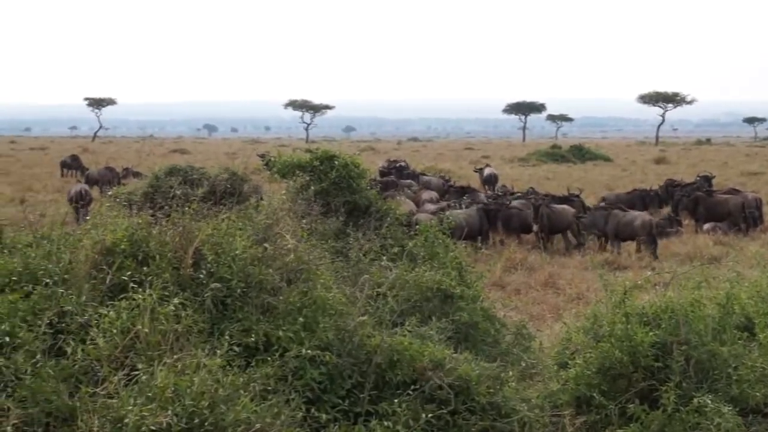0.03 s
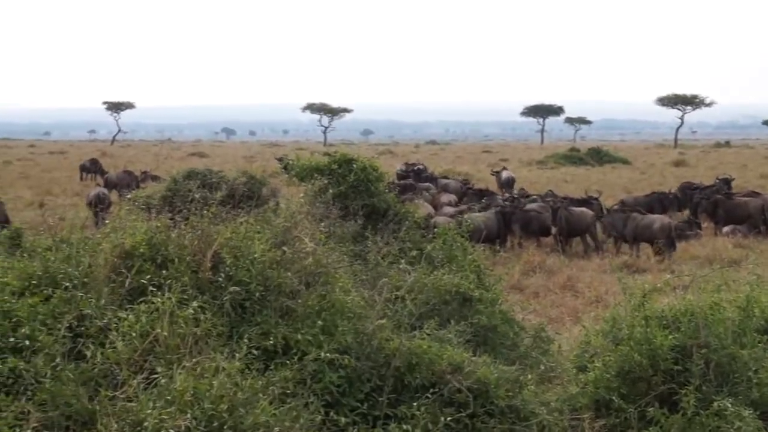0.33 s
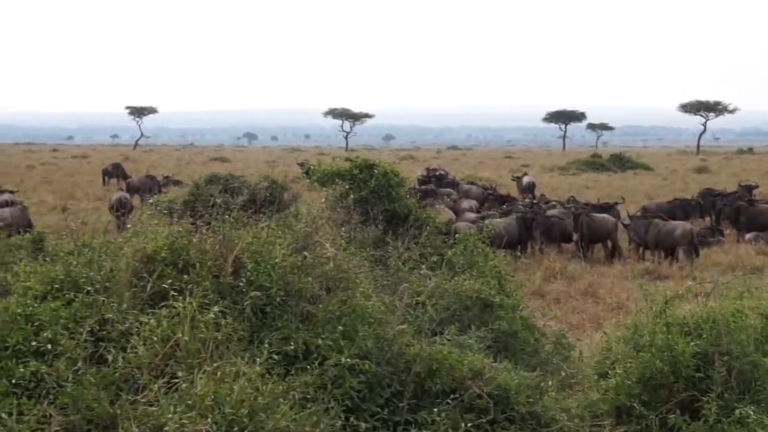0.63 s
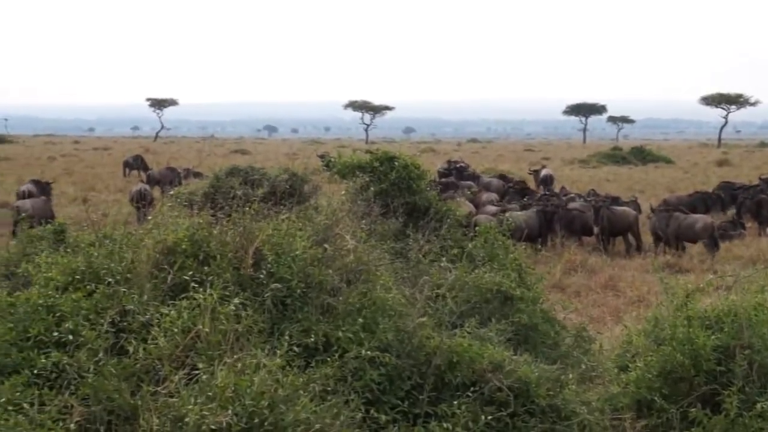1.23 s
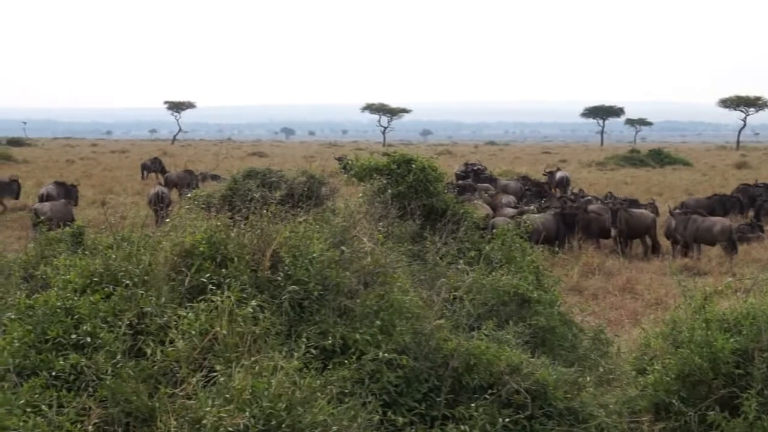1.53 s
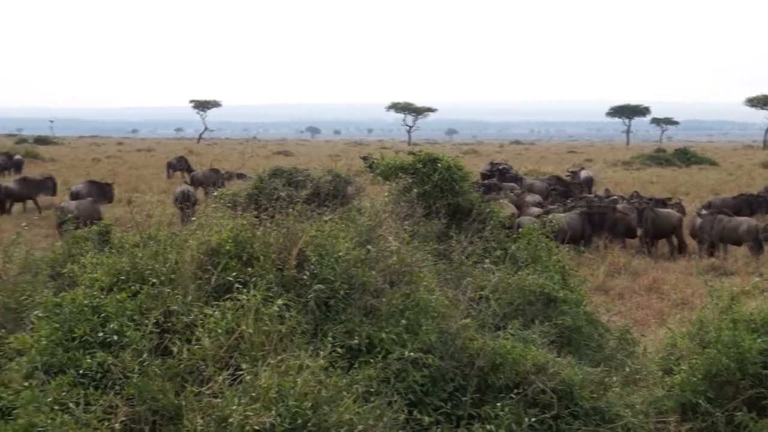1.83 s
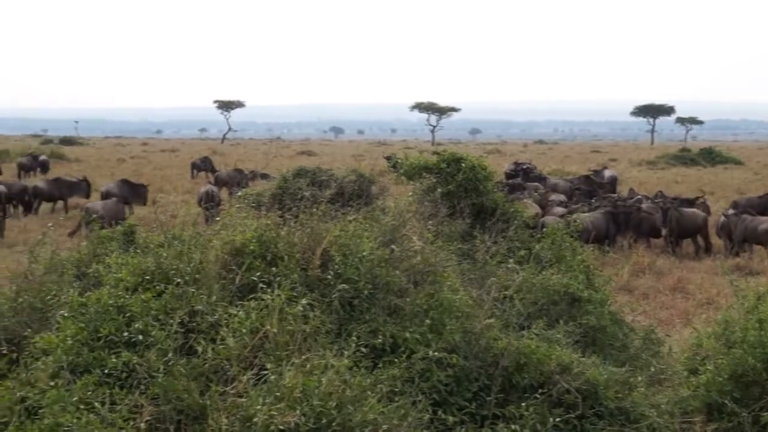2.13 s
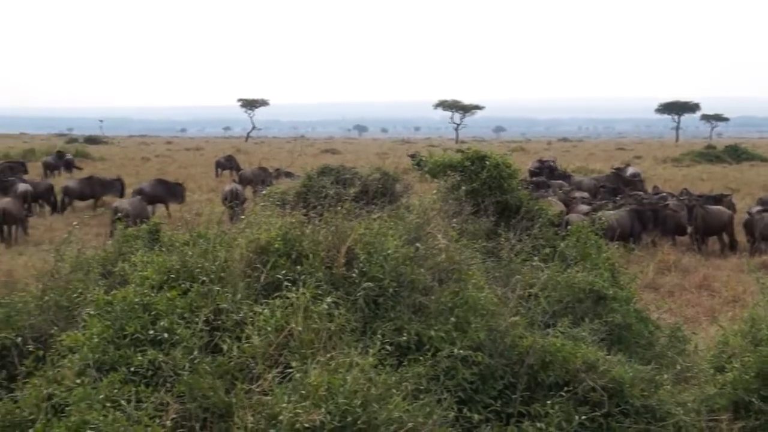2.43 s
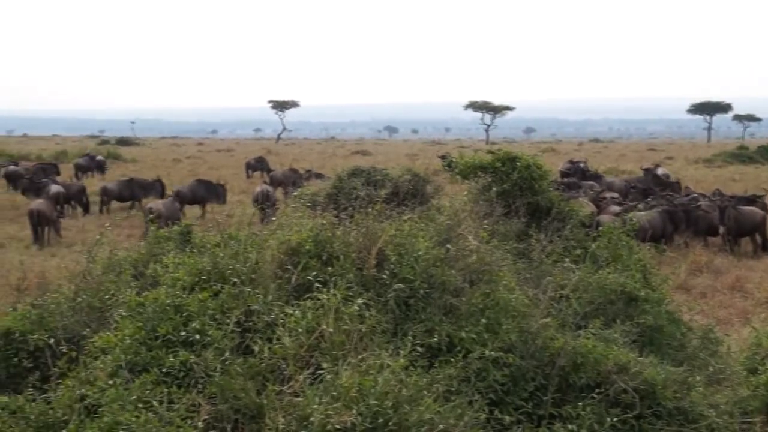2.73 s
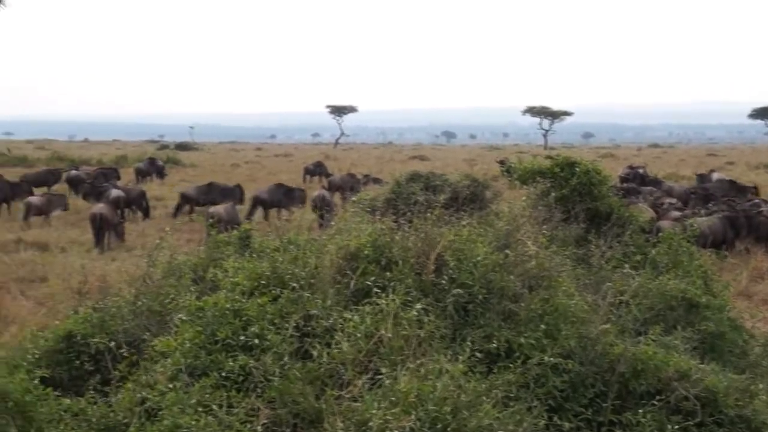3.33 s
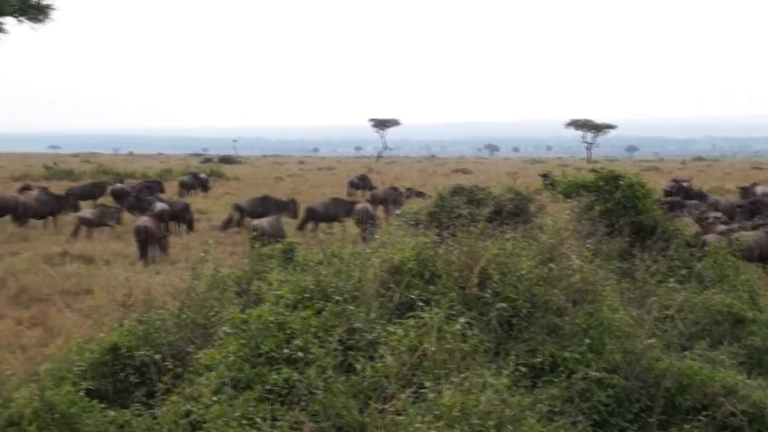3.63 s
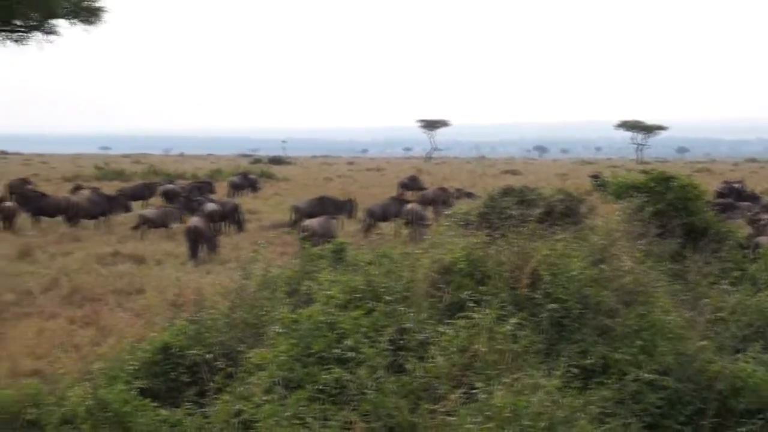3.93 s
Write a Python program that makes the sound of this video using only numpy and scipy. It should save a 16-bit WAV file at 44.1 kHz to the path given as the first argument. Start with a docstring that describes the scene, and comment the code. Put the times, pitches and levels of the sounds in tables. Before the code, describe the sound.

Low, nasal wildebeest grunts follow each other on open savanna over a rumble of wind.

```python
"""Wildebeest grunt one after another on open savanna, in long, nasal voices.
Slow pulses of their vocal folds make the throat ring, and each grunt cracks near its end.
A gust buffets the microphone for the first second, then drops to a low rumble with single puffs.
Faint birds and a thin hiss lie behind."""
import sys
import numpy as np
from scipy import signal
from scipy.fft import rfft, irfft, next_fast_len
from scipy.io import wavfile
from scipy.ndimage import uniform_filter1d, map_coordinates

SR = 44100
rng = np.random.default_rng(int(sys.argv[2]) if len(sys.argv) > 2 else 0)


def file_out(sig):
    """Save sig as 16-bit WAV at sys.argv[1]."""
    # one column per channel
    cols = np.atleast_2d(sig).T
    # limit, then scale
    lim = np.clip(cols, -1, 1)
    pcm = np.round(lim * 32767).astype(np.int16)
    wavfile.write(sys.argv[1], SR, pcm)


N = 176400
ONE_PORT = 0.74  # share of the wind that strikes just one of the microphone's two openings

# where each throat shape rings: f/Hz, width/Hz, level/dB
THROAT_A = [(795, 140, -1.5), (1223, 170, 8), (1800, 99, 5), (2322, 81, 0), (2913, 80, -7),
            (3390, 450, -15), (3750, 180, -13.5)]
THROAT_B = [(523, 61, -10), (713, 90, 0.5), (851, 87, -5.5), (1273, 98, 0), (1653, 210, -14.5),
            (2090, 160, -20.5), (2500, 230, -22.5), (2820, 120, -22.5), (3420, 180, -21.5),
            (3765, 180, -23), (4090, 220, -26)]
THROAT_C = [(189, 58, -3), (568.5, 56, 0), (728, 87, -4), (823, 87, -0.5), (1110, 87, -8.5),
            (1294, 93, -6.5), (1715, 100, -19), (2200, 120, -20), (2340, 100, -22), (2920, 100, -20),
            (3850, 250, -21), (4120, 300, -17), (4520, 160, -23)]
THROAT_C_LATE = [(163, 42, -6.5), (563, 39, 5.5), (694, 66, -0.5), (788, 61, -2), (1140, 85, -6.5),
                 (1330, 97, -10.5), (1770, 90, -10), (2330, 140, -17.5), (2910, 120, -17), (3530, 210, -13),
                 (4070, 660, -14)]
THROAT_D = [(525, 60, -16.5), (682, 89, -9.5), (861, 110, -6.5), (1138, 53, -4), (1278, 79, 4),
            (1657, 156, -8), (1880, 98, -20), (2170, 170, -23.5), (2540, 100, -21.5), (2780, 130, -27),
            (4060, 150, -29)]
THROAT_E = [(540, 91, -3.5), (818, 114, 2), (1196, 130, -4.5), (1349, 93, -2.5), (1700, 180, -11.5),
            (2370, 200, -16), (3000, 250, -15), (3520, 280, -16), (4230, 400, -26)]
THROAT_F = [(804, 190, 7), (1086, 194, 3.5), (1660, 160, -8), (2400, 410, -8), (3324, 260, -2.5),
            (4300, 400, -19), (5330, 300, -15.5), (6670, 680, -14)]


def amp(db):
    """Turn decibels into a gain."""
    return 10 ** (np.asarray(db) / 20)


def unit(x):
    """Scale to an average power of 1."""
    return x / np.sqrt(np.mean(x ** 2) + 1e-20)


def local_level(x, samples, floor=1e-12):
    """Running strength of x; dividing by it evens out chance swells."""
    return np.sqrt(np.abs(uniform_filter1d(x ** 2, samples)) + floor)


def along(points, hz):
    """Read between (f/Hz, value) points on a logarithmic frequency axis."""
    f, values = np.transpose(points)
    return np.interp(np.log(hz + 1), np.log(f + 1), values)


def clock():
    """Time of each sample in seconds."""
    return np.arange(N) / SR


def curves(rows):
    """Draw each column after the time as one value per sample."""
    times, *columns = np.transpose(rows)
    return [np.interp(clock(), times, column) for column in columns]


def filtered(x, response):
    """Multiply each frequency f in x by response(f)."""
    size = next_fast_len(N + SR // 2)
    return irfft(rfft(x, size) * response(np.fft.rfftfreq(size, 1 / SR)), size)[..., :N]


def split(x, hz, order=8):
    """The parts of x below and above hz."""
    low = filtered(x, lambda f: 1 / (1 + (f / hz) ** order))
    return low, x - low


def air(colour, width, one_port):
    """Stereo noise: mid is what left and right share, side is how they differ."""
    noise = filtered(rng.standard_normal((2, N)), lambda f: amp(along(colour, f)))
    mid, other = map(unit, noise)
    # wind on one opening alone reaches left and right out of step (1j is a quarter cycle)
    side = filtered(mid, lambda f: 1j * one_port ** .5 * amp(along(width, f)))
    side += filtered(other, lambda f: (1 - one_port) ** .5 * amp(along(width, f)))
    return np.array([mid - side, mid + side])


def hiss():
    """A thin hiss that dips during the gust and slowly returns."""
    loudness = [(.03, -65.5), (.33, -68), (.7, -75.5), (.88, -74), (.96, -80), (1.15, -78.5), (1.28, -75),
                (1.82, -78.5), (2.05, -69.5), (2.16, -72), (2.45, -66), (3.4, -66.5), (3.9, -63)]  # dip and return: t/s, relative level/dB
    colour = [(200, 10.5), (700, 8), (1500, 3.5), (3000, 3), (5000, -1), (8000, -0.5), (12500, 0),
              (15500, -3.5)]  # tone: f/Hz, level/dB
    width = [(300, -2.5), (3000, 2), (5000, 4), (8000, -20.5), (13000, -7.5)]  # stereo width: f/Hz, side over mid/dB
    level_db, = curves(loudness)
    return air(colour, width, 0) * amp(level_db + 7)


def birds():
    """Thin far whistles and chirps, blurred by distance into narrow bands of noise."""
    calls = [(0.663, .11, 3670, 50, -78.5), (.835, 0.045, 3990, 400, -68.5), (0.942, 0.14, 2330, 50.4, -70),
             (0.973, 0.079, 1596, 40.5, -60.5), (1.21, .035, 6600, 300, -73)]  # bird notes: t/s, length/s, f/Hz, width/Hz, level/dB
    out = np.zeros(N)
    for start, length, hz, width, db in calls:
        note = unit(filtered(rng.standard_normal(N), lambda f: np.exp(-.5 * ((f - hz) / width) ** 2)))
        progress = np.clip((clock() - start) / length, 0, 1)
        out += amp(db) * note * np.sqrt(np.abs(np.sin(np.pi * progress)))
    return out


def breeze():
    """A low, uneven rumble of wind between the buffets."""
    loudness = [(1.2, -41.5), (1.5, -30.5), (1.57, -38.5), (1.68, -33), (1.8, -42), (2.02, -35),
                (2.3, -40.5), (2.38, -46), (2.6, -46.5), (2.85, -40), (3.05, -40.5), (3.3, -31),
                (3.5, -44.5), (3.62, -33), (3.8, -29), (4, -34)]  # swells: t/s, level/dB
    colour = [(12, -30), (20, -1.5), (43, 7), (139, -1), (293, -18), (450, -37), (1500, -100)]  # tone: f/Hz, level/dB
    width = [(60, -10.5), (240, -3), (950, 9)]  # stereo width: f/Hz, side over mid/dB
    level_db, = curves(loudness)
    rumble = air(colour, width, ONE_PORT)
    return rumble / local_level(rumble.mean(0), samples=3000, floor=.05) * amp(level_db)


def gust():
    """Swirling air hits the microphone: the harder the swirl, the higher its sound reaches."""
    long_gust = [(0, -21, 305), (.25, -20.5, 326), (.48, -20.5, 318), (.57, -24, 390), (.6, -23.5, 278),
                 (.68, -29.5, 230), (.76, -25, 268), (.87, -21.5, 298), (.92, -21.5, 493), (1, -19.5, 495),
                 (1.13, -26.5, 429), (1.22, -26.5, 450), (1.26, -33.5, 230), (1.38, -57.5, 149.3)]  # opening gust: t/s, relative level/dB, reach/Hz
    puffs = [(0.297, 0.019, -19, 420), (0.416, 0.007, -17, 376), (0.538, 0.018, -14.5, 400),
             (0.568, 0.0045, -18, 580), (0.622, 0.0057, -17.5, 660), (0.731, 0.003, -22.5, 460),
             (0.745, 0.0032, -18.5, 350), (0.788, 0.0088, -17.5, 440), (.908, 0.0021, -17, 656),
             (0.93, 0.027, -20.5, 550), (1.05, 0.006, -15, 725), (1.092, 0.017, -16.5, 603),
             (1.118, 0.0035, -19, 610), (1.155, 0.0098, -16, 506), (1.186, 0.0093, -16, 610),
             (1.219, 0.011, -16.5, 598), (1.283, 0.0051, -21, 310), (1.313, 0.027, -25.5, 216),
             (1.633, 0.011, -29, 138), (1.693, 0.015, -29.5, 171), (2.01, 0.023, -27, 163),
             (2.116, 0.0058, -38.5, 197), (2.188, 0.0039, -22.5, 287), (2.193, 0.0091, -25.5, 169),
             (2.223, 0.0058, -25, 209), (2.264, 0.007, -33, 201), (2.719, 0.0066, -30.5, 141),
             (3.158, 0.018, -19.5, 150), (3.35, 0.025, -19.5, 168), (3.384, 0.004, -17.5, 230),
             (3.708, 0.013, -27, 166), (3.805, 0.0094, -19, 155), (3.909, 0.008, -23.5, 165)]  # single buffets: t/s, half length/s, relative level/dB, reach/Hz
    colour = [(15, -30.5), (25, -10.5), (70, 2), (150, 2.5), (260, 2.5), (420, -0.5), (750, -1), (1300, -6),
              (2000, -5.5)]  # tone before the highs are dulled: f/Hz, level/dB
    width = [(30, -15.5), (60, -11.5), (180, -1.5), (500, 5.5), (1600, 6)]  # stereo width: f/Hz, side over mid/dB
    swirls_per_s, swirl_db, swirl_reach = 170, 1.26, 0.12
    t = clock()
    level_db, gust_hz = curves(long_gust)
    swirls = map_coordinates(rng.standard_normal(2000), [t * swirls_per_s])
    power = amp(2 * (level_db + swirl_db * swirls))
    weighted_hz = power * gust_hz  # the loudest part sets the brightness
    for at, half_length, db, puff_hz in puffs:
        puff = amp(2 * db) / (1 + ((t - at) / half_length) ** 6)
        power += puff
        weighted_hz += puff * puff_hz
    reach_hz = weighted_hz / power * np.exp(swirl_reach * swirls)
    rest = air(colour + [(4000, -20), (8000, -80)], width, ONE_PORT)
    wind = 0
    for hz in np.geomspace(100, 2800, 9):  # bands above the reach fade away
        band, rest = split(rest, hz * 1.23, order=10)
        wind += band * np.exp(-(hz / reach_hz) ** 1.495)
    fade_in = np.minimum(t / .003, 1)
    return wind / local_level(wind.mean(0), samples=900) * np.sqrt(power) * amp(-2) * fade_in


def bush_echo(sound):
    """Bushes scatter a short, weak echo."""
    decay = [(300, 0.11), (1500, 0.29), (6000, 0.034)]  # echo length: f/Hz, time/s (to fall by 60 dB)
    hz, t, noise = signal.stft(rng.standard_normal((2, SR // 2)), SR, nperseg=256)
    tail = signal.istft(noise * amp(-60 * t / along(decay, hz)[:, None]), SR, nperseg=256)[1]
    return amp(-13) * signal.fftconvolve(sound, tail / np.linalg.norm(tail[0]), axes=1)[:, :N]


def grass_blur(x, longest_s=.006, band_hz=300):
    """Grass and bushes blur each pulse: every narrow band arrives late by its own amount."""
    delays = rng.uniform(0, longest_s, size=80)
    delay = lambda f: np.interp(f / band_hz, np.arange(len(delays)), delays)
    return filtered(x, lambda f: np.exp(-2j * np.pi * np.cumsum(delay(f)) * f[1]))


def vocal_folds(pitch_hz, rough, jitter_s=0.00062, scatter_db=1):
    """Each flap gives a pulse and a puff of air; roughness upsets the pulses' timing and size."""
    cycles = np.cumsum(pitch_hz) / SR
    flaps = np.flatnonzero(np.diff(np.floor(cycles)))
    timing, size = rng.standard_normal((500, 2))[:len(flaps)].T
    when = np.clip(flaps + timing * jitter_s * SR * rough[flaps], 0, N - 1).astype(int)
    pulses = unit(np.bincount(when, amp(scatter_db * size * rough[flaps] ** .5), N))
    puffs = unit(rng.standard_normal(N) * np.exp(-(cycles % 1)))
    return np.array([pulses, puffs])


def throat_response(throat, f):
    """A throat rings at a few sharp peaks and lets little through elsewhere."""
    peaks = sum(amp(db) * (1j * f * width / (hz * hz - f * f + 1j * f * width)) ** 2
                for hz, width, db in throat)
    low_hz, high_hz = .75 * min(throat)[0], 1.15 * max(throat)[0]
    return peaks / (1 + (f / high_hz) ** 10) / (1 + (low_hz / (f + 1)) ** 10)


def grunt(throat, end_throat, start, full, crack, end, top_hz, top_s, arch_s,
          rough, body_db, crack_db, treble_db, growth_db_per_s, pan_db):
    """The folds ring the throat: the voice swells, holds, cracks and is cut off."""
    pitch_sag, crack_s = .055, 0.036
    swell_db, release_db_per_s = 22.5, 329.5
    rasp_db, rasp_release_db_per_s = 3.5, 200  # the crack adds treble, which dies faster than the body
    t = clock()
    pitch_hz = top_hz * (1 - pitch_sag * np.minimum(np.abs((t - top_s) / arch_s) ** 3, 1))
    early = np.clip((full - t) / (full - start), 0, None)
    cracked = np.clip((t - crack) / crack_s, 0, 1)
    before_s, after_s = np.maximum(start - t, 0), np.maximum(t - end, 0)
    effort_db = -swell_db * early - release_db_per_s * (before_s + after_s)
    treble_db = treble_db + growth_db_per_s * (np.clip(t, start, end) - top_s)
    treble_db += rasp_db * cracked - rasp_release_db_per_s * after_s
    edges = np.maximum(np.minimum(4 * early, 1), cracked)
    rough = np.clip(rough + 0.2 * edges, 0, .9)  # the folds flap roughly at both ends
    pulses, puffs = grass_blur(vocal_folds(pitch_hz, rough))
    breath = np.array([rough, np.clip(rough + 0.37, 0, 1)])  # the body, then the breathier treble
    source = np.sqrt(1 - breath) * pulses + np.sqrt(breath) * puffs
    ringing = (1 - cracked) * filtered(source, lambda f: throat_response(throat, f))
    ringing += cracked * filtered(source, lambda f: throat_response(end_throat, f))
    voice = 0
    for band, db in enumerate([body_db + crack_db * cracked, treble_db]):
        part = split(ringing[band], hz=2230)[band]
        voice += part / local_level(part, samples=2600) * amp(db + effort_db)
    return voice * amp([[pan_db / 2], [-pan_db / 2]])


def herd():
    """Six grunts in a row, the last one in two pushes, with their echo from the bushes."""
    # the calls: throat, throat after the crack, start/s, full voice/s, crack/s, end/s, top pitch/Hz,
    # time of that top/s, half length of the pitch arch/s, roughness (0-1), body level/dB,
    # its change at the crack/dB, treble level/dB, its growth/(dB per s), left over right/dB
    grunts = [(THROAT_A, THROAT_A, 0.012, 0.1, .39, 0.445, 89, 0.27, .25, 0.11, -59.5, 0, -69, 34, 0),
              (THROAT_B, THROAT_B, 1.04, 1.322, 1.47, 1.533, 86.4, 1.37, .11, .1, -42.5, -6.5, -64.5, 16, -1.5),
              (THROAT_C, THROAT_C_LATE, 2.223, 2.473, 2.585, 2.69, 91, 2.53, .18, 0.036, -42.5, -1.1, -59, 5.9, -0.9),
              (THROAT_D, THROAT_D, 2.94, 3.005, 3.18, 3.27, 87.8, 3.115, .11, .04, -38, -0.86, -60.5, -26, -3.2),
              (THROAT_E, THROAT_F, 3.502, 3.635, 3.72, 3.745, 75.9, 3.65, .17, 0.094, -46, 2, -60, 35, 10.2),
              (THROAT_F, THROAT_F, 3.71, 3.765, 3.79, 3.805, 89, 3.8, .1, .12, -42.5, -2, -52, 10, 6.9),
              (THROAT_F, THROAT_F, 3.81, 3.845, 3.875, 3.925, 97, 3.87, .07, .1, -44.5, -3.5, -59.5, 15, 6.5)]
    left_lead = [(100, 0.18), (500, -0.3), (1300, 0.1), (2600, -0.43), (4000, -0.3)]  # how far the left channel's wave runs ahead: f/Hz, phase/radians
    voices = sum(grunt(*row) for row in grunts)
    direct = filtered(voices, lambda f: np.exp(.5j * along(left_lead, f) * np.array([[1], [-1]])))
    return direct + bush_echo(direct)


def scene():
    """Herd, wind and background together."""
    return herd() + gust() + breeze() + birds() + hiss()


def record(dry):
    """Cut off the very highest treble."""
    return filtered(dry, lambda hz: hz < 15760)


dry = scene()
out = record(dry)
file_out(out)
```